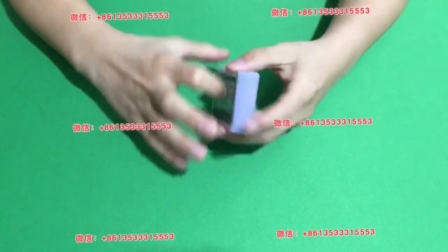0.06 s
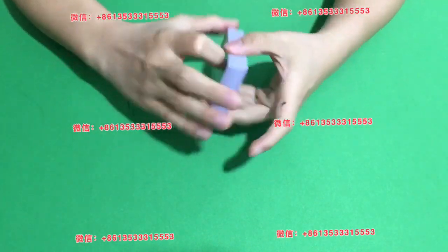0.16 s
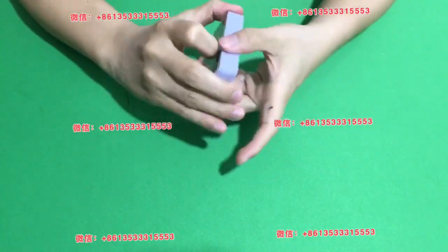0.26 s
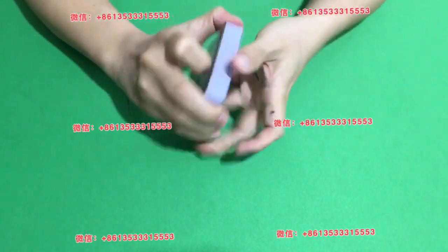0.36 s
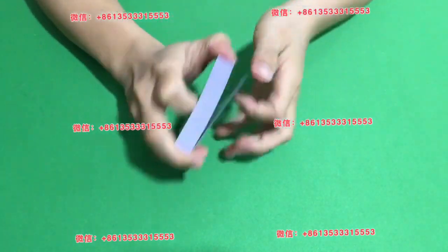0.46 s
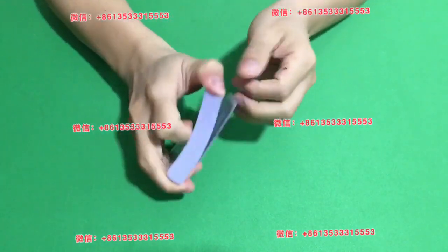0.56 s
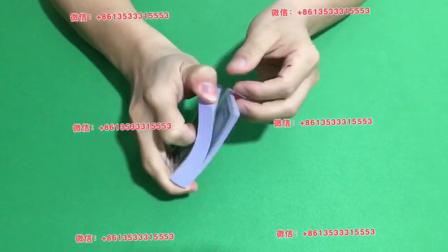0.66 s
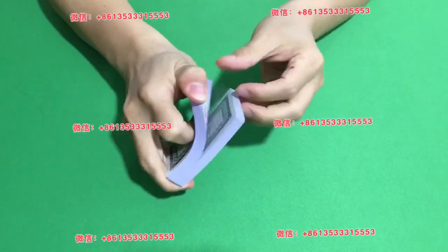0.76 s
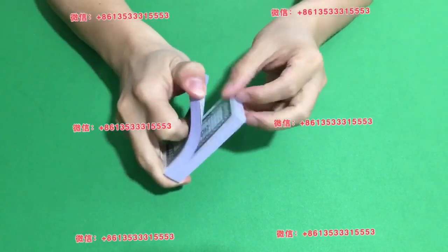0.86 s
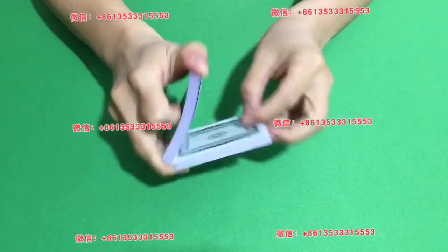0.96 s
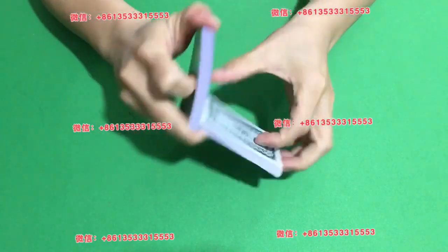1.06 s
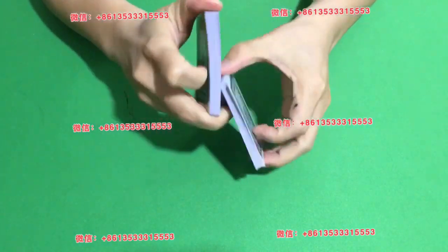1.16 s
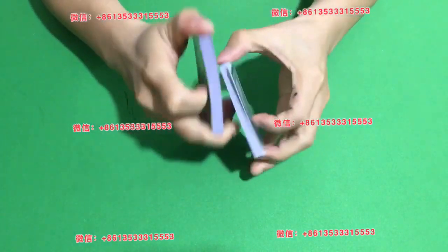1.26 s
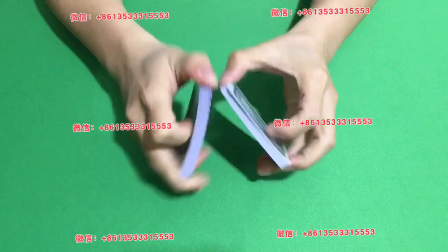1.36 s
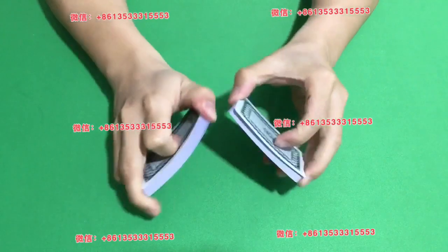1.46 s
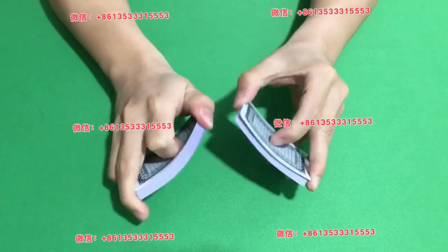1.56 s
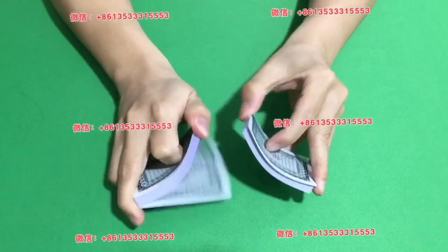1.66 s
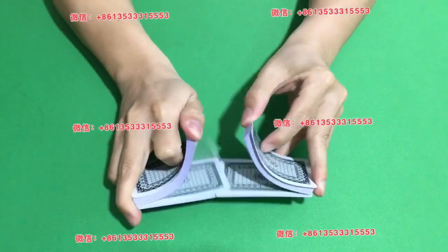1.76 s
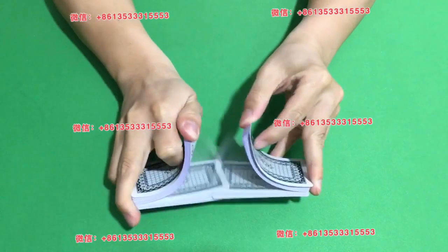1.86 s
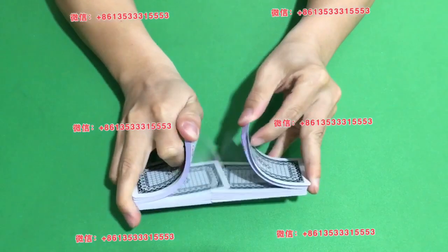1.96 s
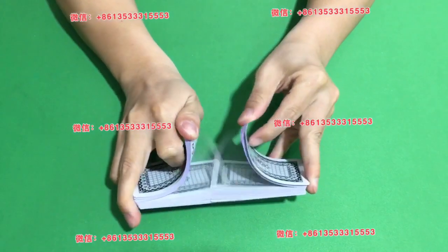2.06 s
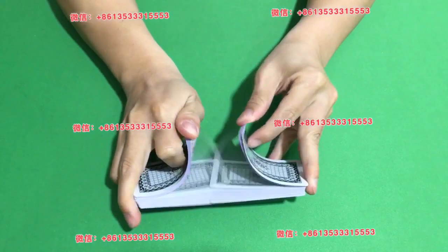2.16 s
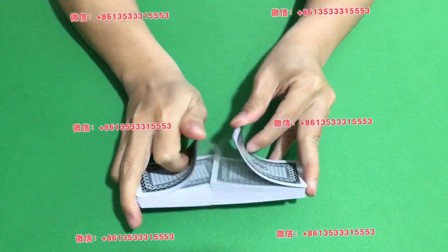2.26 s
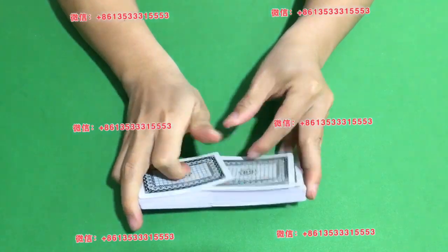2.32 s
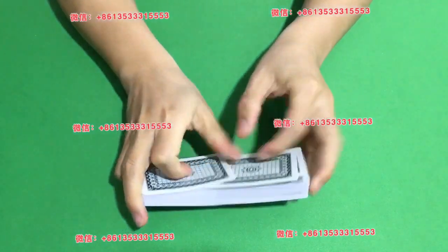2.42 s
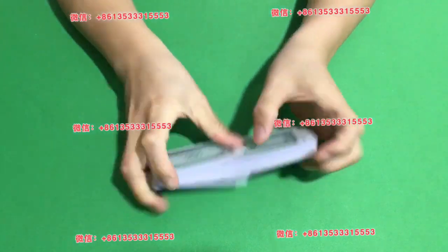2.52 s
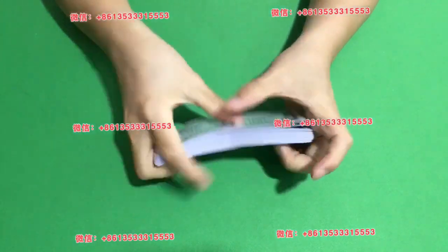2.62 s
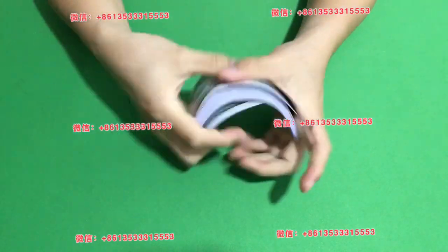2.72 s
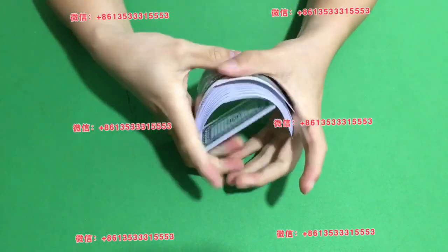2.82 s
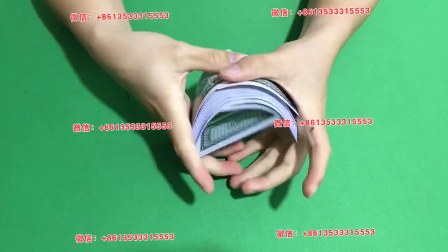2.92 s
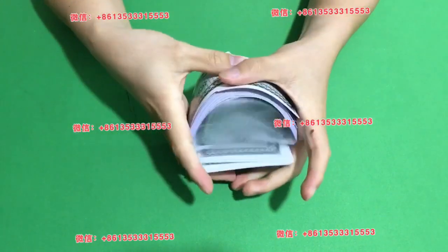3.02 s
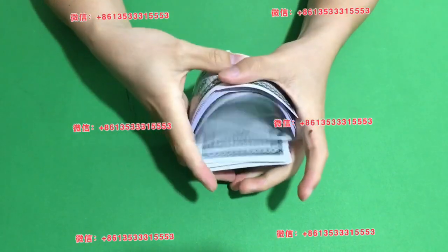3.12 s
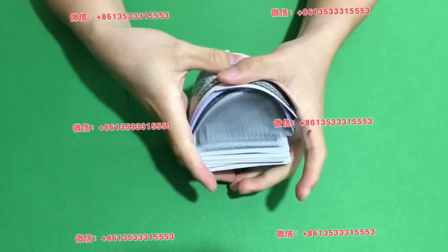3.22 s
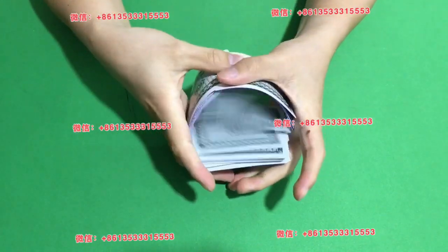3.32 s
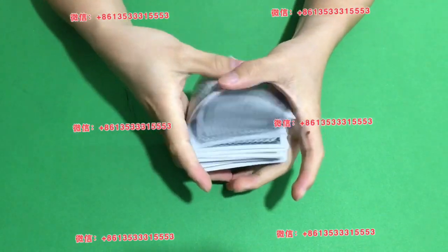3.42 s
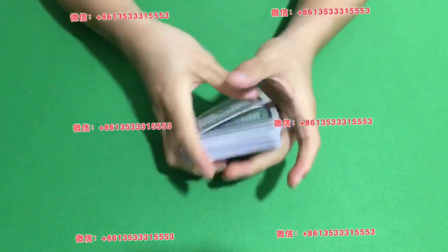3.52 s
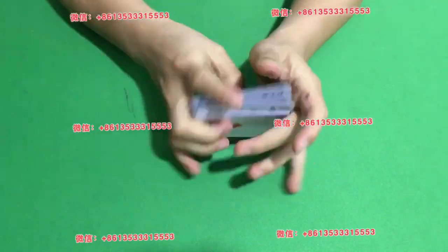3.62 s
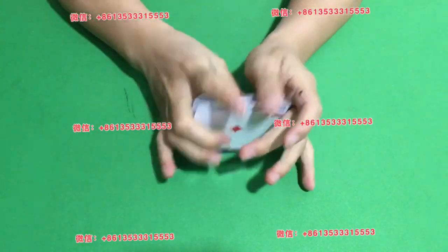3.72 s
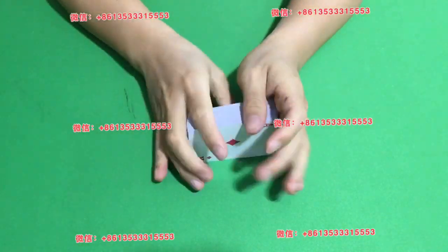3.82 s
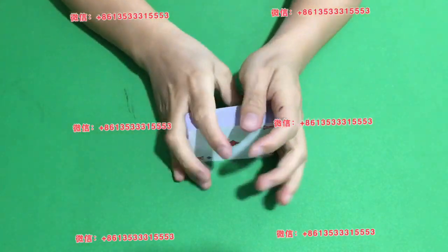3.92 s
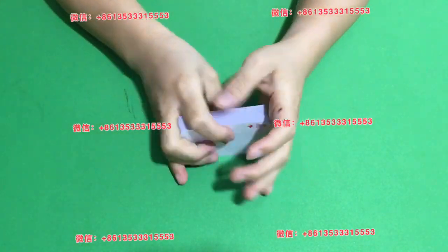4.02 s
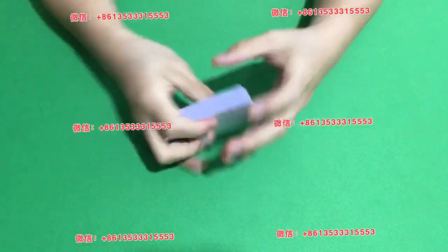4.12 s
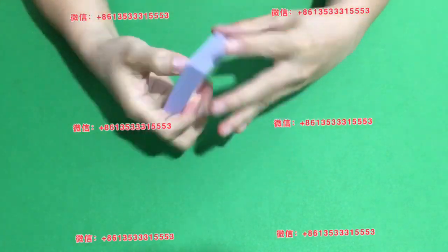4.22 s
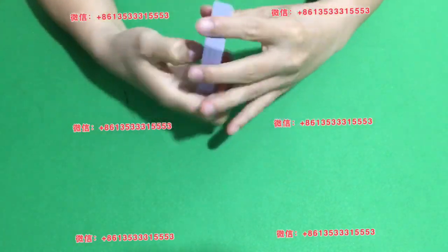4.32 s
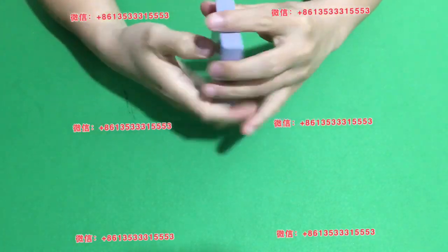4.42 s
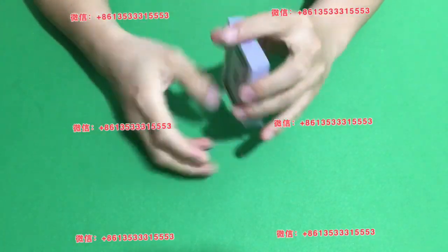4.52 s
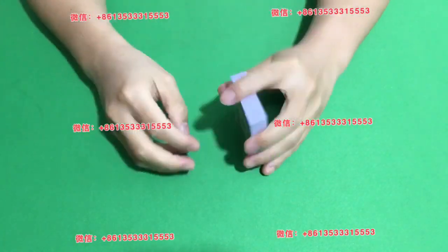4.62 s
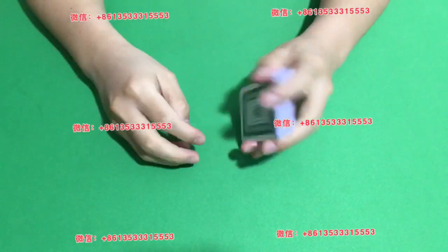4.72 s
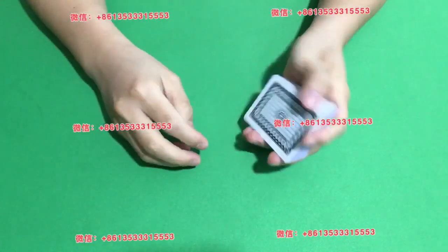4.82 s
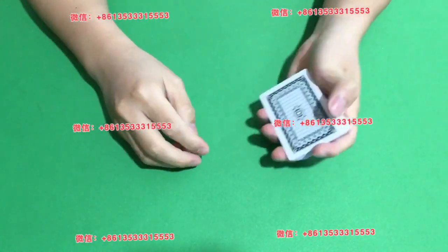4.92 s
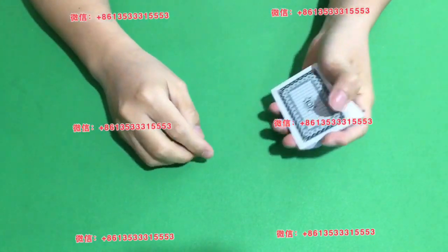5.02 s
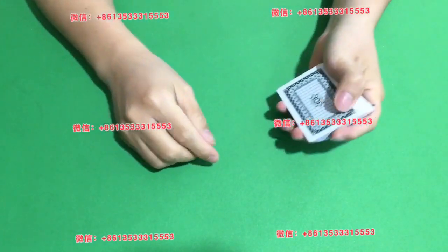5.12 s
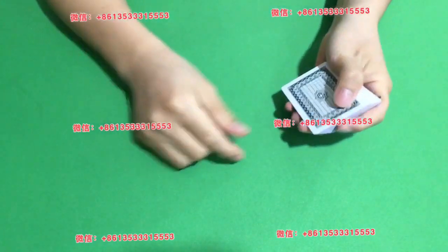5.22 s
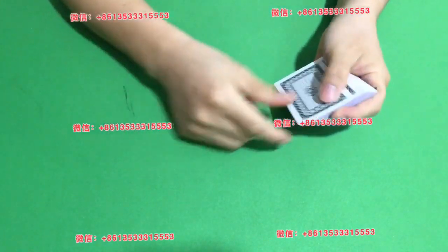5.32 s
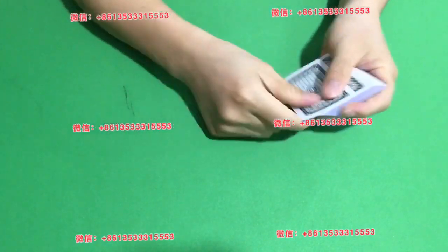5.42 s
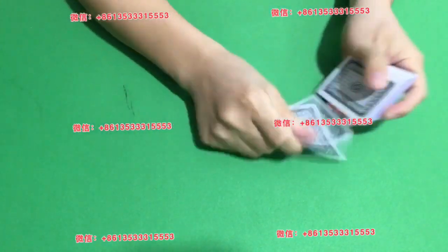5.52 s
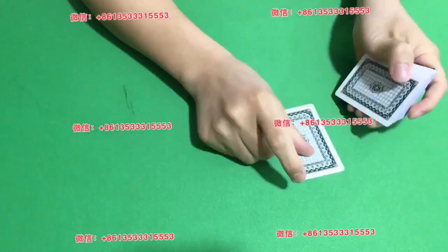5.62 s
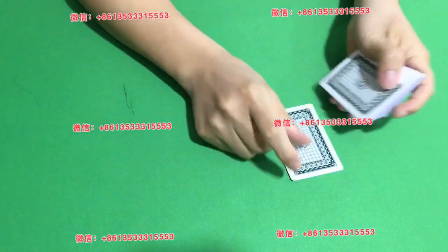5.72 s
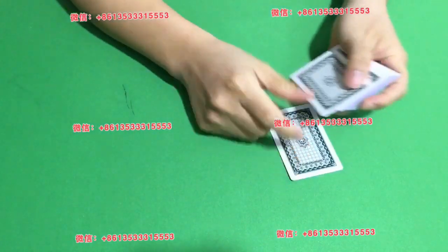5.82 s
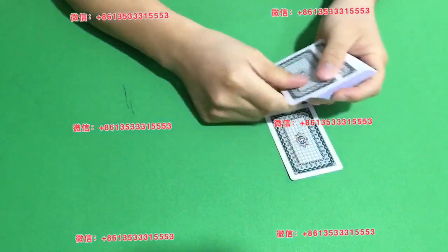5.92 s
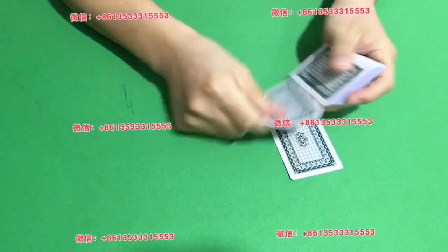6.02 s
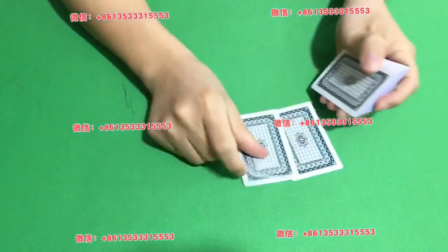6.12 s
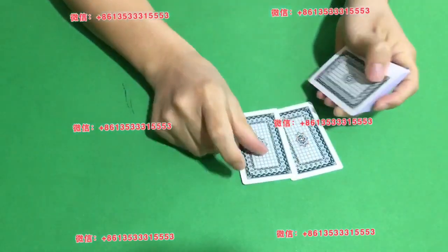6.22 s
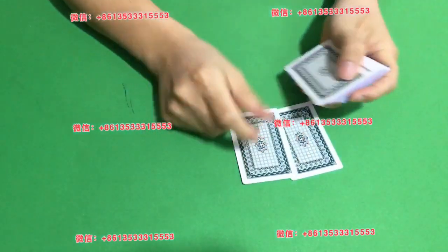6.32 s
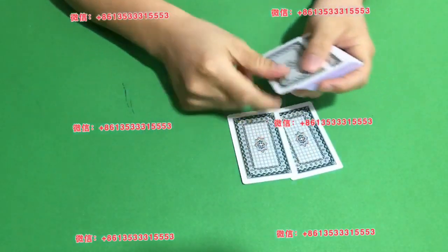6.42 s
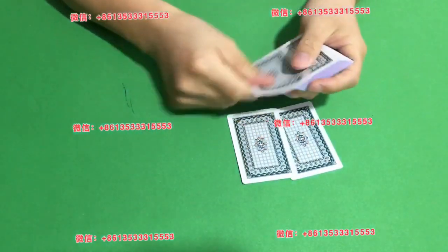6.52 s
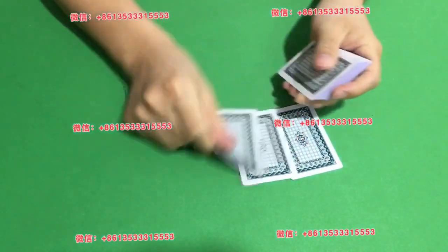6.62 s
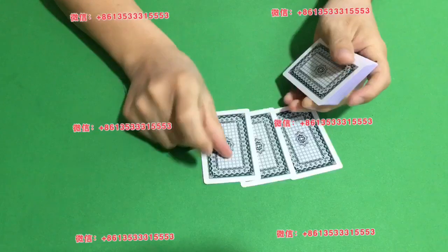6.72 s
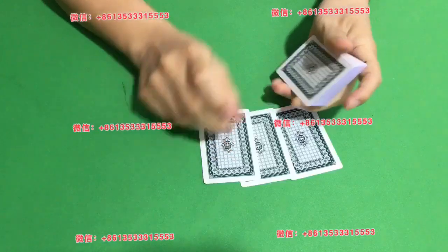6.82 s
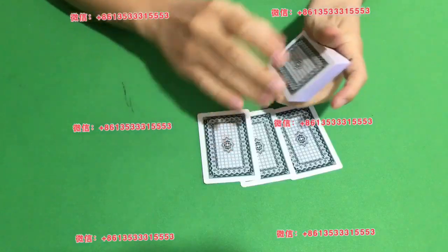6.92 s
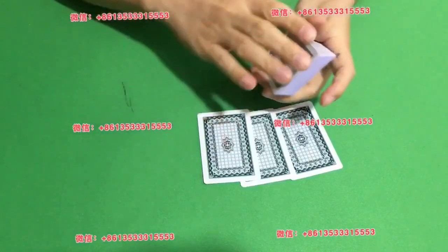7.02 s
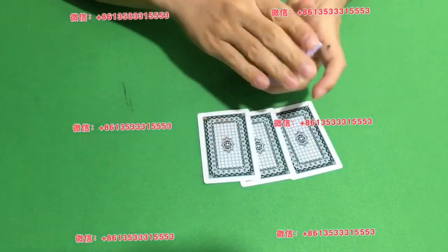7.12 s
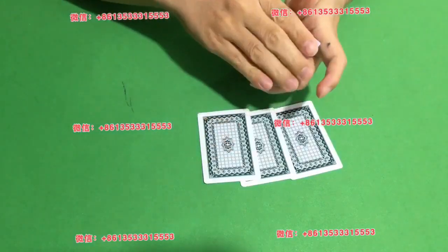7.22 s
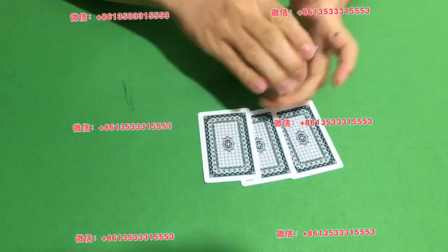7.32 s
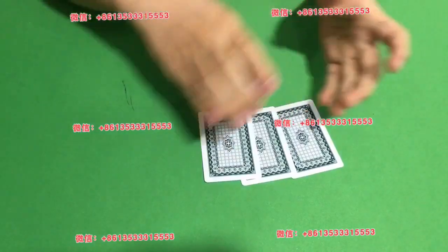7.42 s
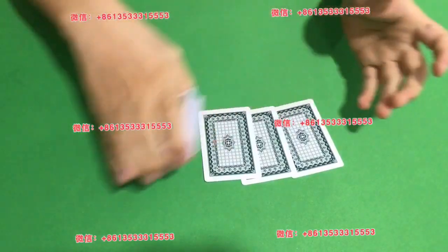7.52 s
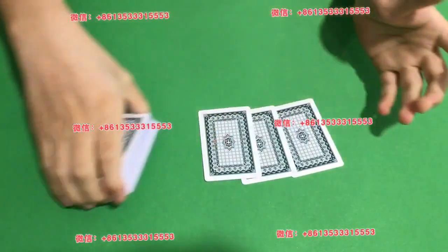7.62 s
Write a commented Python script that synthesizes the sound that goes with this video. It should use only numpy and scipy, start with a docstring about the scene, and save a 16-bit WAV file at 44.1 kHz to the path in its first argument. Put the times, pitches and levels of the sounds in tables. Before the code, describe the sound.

A small room with low rumbling air, faint hum and a soft fan scuff about seven times a second, rising during the first second. Close to the microphone, light card clicks from 0.4 s lead into a brief purr of corners, swelling to 0.7 s, and a tiny tap at 1.0. From 1.6 to 2.25 s a riffle crackles, dull at first, then brighter, with growing rubbing. A faint creak at 2.7 precedes the bridge, 2.9 to 3.4 s: a violent flutter, then an even run of slaps. At 3.7 the halves are shoved square with a muffled crunch and dull thump. A loud, deep knock at 4.55 booms through the padded table and room, with much weaker knocks either side. Three cards swish, snap and land softly near 5.45, 5.95 and 6.5 s, the last duller with a small knock. Quiet follows until a faint tap and thud at 7.4.

```python
"""In a small room with a low hum, something that turns, probably a fan, scuffs softly about seven times a second.
At a cloth-covered table a deck of cards is cut, riffled, bridged and pushed square; one loud knock stands out.
Then three cards are slid off the deck, flicked free and laid down.
Cards are made of short noise bursts, ringing tones and shaped hiss; knocks are sums of fading tones.
The fan is pulsed noise through resonances plus sine waves, and the air is filtered noise."""
import sys
import numpy as np
from scipy import signal
from scipy.fft import rfft, irfft
from scipy.io import wavfile

SR = 44100
rng = np.random.default_rng(int(sys.argv[2]) if len(sys.argv) > 2 else 0)


def wav_record(signal):
    """Record a signal, one row per channel, as 16-bit PCM in the file named by sys.argv[1]."""
    frames = np.transpose(np.atleast_2d(signal))
    bounded = np.clip(frames, -1, 1)
    # unit amplitude maps onto the largest positive 16-bit level
    quanta = np.round(bounded * 32767).astype(np.int16)
    wavfile.write(sys.argv[1], SR, quanta)


N = 338247
TIME = np.arange(N) / SR   # seconds

# room air, relative strength at each pitch: f/Hz, level/dB
AIR_COLOUR = [(25, -33.5), (36, -16), (47, 3.5), (58, -4), (85, -2), (105, -2.5), (140, 2), (220, -7.5),
              (400, -17), (800, -21.5), (1400, -27), (2000, -32.5), (3000, -39.5), (5000, -45.5),
              (15500, -53.5)]
# steady tones of the fan: f/Hz, rms level/dB
FAN_HUM = [(48.4, -59.5), (301.5, -67)]
# the fan's uneven rotation: t/s, turns made so far
FAN_TURNS = [(0, 0), (0.865, 6), (1.165, 8), (1.44, 10), (2.405, 17), (2.685, 19), (3.425, 24), (3.965, 28),
             (4.405, 31), (5.035, 35), (5.305, 37), (6.275, 44), (6.805, 48), (7.76, 55)]
# resonances of the fan housing: f/Hz, width of each of two passes/Hz, relative level/dB
FAN_HOUSING = [(420, 250, -2), (900, 330, 1), (1370, 280, 0), (1800, 900, -10), (3550, 450, -15)]
# time for the room's echoes to fade by 60 dB: f/Hz, fade time/s
ROOM_T60 = [(80, 0.96), (200, 1), (500, 0.97), (2000, 0.56), (5000, 0.57), (15000, 0.52)]
# the room's standing waves: f/Hz, level relative to the knock/dB, time to fade by 60 dB/s
ROOM_MODES = [(88, -29, 1.1), (100.3, -35.5, .7), (137, -29, 1), (168.4, -35, 1.1), (192, -33.5, 0.88),
              (205.3, -31.5, .9), (228.4, -38, 0.75), (270, -40, .7), (427, -53, .9), (533, -51.5, 0.78),
              (578, -50.5, .7)]
# the table top's own tones: f/Hz, level relative to the knock/dB, time to fade by 60 dB/s
TABLE_MODES = [(77, -15, 0.18), (132, -13, 0.089), (158.5, -10.5, 0.091), (207, -19.5, 0.14),
               (309, -22.5, 0.1), (453, -23, 0.054), (632, -27, 0.072), (788, -33.5, 0.045),
               (1117, -29.5, 0.023), (1480, -39.5, 0.028)]
# the deck knocks on the table, one of them far louder: t/s, level/dB
KNOCKS = [(3.72, -21.5), (4.426, -28), (4.555, 0), (4.677, -24), (6.498, -22), (7.431, -27.5)]
# packets slide over one another: middle t/s, length/s, level/dB
SLIDES = [(0.455, 0.028, -65.5), (2.473, 0.083, -66), (2.898, 0.14, -53), (3.35, 0.085, -54),
          (3.964, 0.1, -67), (6.545, 0.098, -64.5), (6.607, .016, -64)]
# packets land flat: t/s, level before TAP_GAIN_DB/dB
TAPS = [(1.029, -54), (3.641, -52), (3.658, -46), (3.671, -35), (3.69, -37), (3.699, -31.5), (3.716, -43),
        (3.7393, -34), (5.323, -55), (7.4, -48.5)]
# three dealt cards: flick t/s, slide level/dB, flick level/dB, level of all modes/dB, ring f/Hz, ring level/dB,
# lingering ring relative to the ring/dB, upper edge of flick and modes f/Hz, lay-down t/s, lay-down level/dB
DEALS = [(5.4343, -60, -10.5, -28, 3290, -28.5, -55, 9000, 5.4926, -33),
         (5.9446, -58.5, -12.5, -35.5, 2350, -25, -31, 7000, 6.0354, -36.5),
         (6.496, -55.5, -11, -31.5, 830, -28, -40, 2970, 6.5896, -37)]
# bending tones of a flicked card: f/Hz, relative level/dB, decay/s
CARD_MODES = [(310, -2, 0.0046), (850, -7.5, .003), (1232, -3, .004), (1795, -8.5, .0028), (2330, -5, .003)]
# single card-edge clicks, a few around the cut, the rest in the riffle:
# t/s, level before trims/dB, ring f/Hz, treble relative to body before trims/dB
CARD_SNAPS = [(0.396, -42.5, 2820, -14), (0.481, -40.5, 2510, -16), (0.563, -38.5, 1150, -21),
              (0.688, -43, 3100, -24), (0.705, -43, 3600, -24), (0.727, -49, 3400, -24),
              (1.574, -38, 1020, -43), (1.586, -39.5, 1310, -36), (1.602, -34.5, 1340, -35),
              (1.615, -35.5, 1350, -35), (1.635, -36, 1000, -35), (1.654, -33.5, 1170, -32),
              (1.658, -31.5, 1380, -18), (1.666, -29.5, 1710, -24), (1.685, -34, 1620, -19),
              (1.695, -34, 1040, -35), (1.704, -39, 1120, -24), (1.718, -27.5, 1770, -19),
              (1.725, -32, 1310, -13), (1.753, -27, 2270, -17.5), (1.767, -39, 1210, -23),
              (1.778, -33, 2150, -15), (1.793, -44, 1060, -30), (1.8, -33, 1490, -29),
              (1.809, -28, 2230, -17.5), (1.826, -33, 1440, -28), (1.835, -29.5, 1510, -14),
              (1.844, -29.5, 2020, -15), (1.866, -35, 1490, -11), (1.87, -34, 2020, -15),
              (1.886, -31, 1070, -28), (1.896, -26.5, 1870, -17.5), (1.913, -35, 2060, -15),
              (1.921, -34, 1470, -8.5), (1.939, -37, 1040, -21), (1.951, -28.5, 2270, -15.5),
              (1.974, -39, 1290, -22), (1.996, -29, 1510, -12.5), (2.004, -36, 1500, -12),
              (2.022, -34, 1460, -12), (2.037, -29, 3030, -11), (2.044, -37.5, 3110, -6.5),
              (2.084, -27, 2250, -20), (2.101, -33.5, 1000, -9.5), (2.108, -36, 1800, -9),
              (2.127, -34, 1830, -11), (2.133, -33, 1290, -13), (2.145, -30.5, 2430, -11.5),
              (2.153, -32, 1230, -16), (2.184, -33, 1210, -24), (2.192, -35, 1700, -9),
              (2.204, -35, 2400, -8.5), (2.21, -34, 3670, -16), (2.232, -35.5, 2180, -7),
              (2.241, -25, 1900, -14), (2.252, -26.5, 1420, -24)]
# single bridge cards slapping on the pile, and one card-edge tick after the bridge: t/s, level before trims/dB,
# ring f/Hz, # treble relative to body before trims/dB, thud of the pile before trims/dB
BRIDGE_SLAPS = [(2.915, -31, 1530, -20, -48), (2.932, -25, 3040, -12.5, -22),
                (2.9497, -22, 2860, -14.5, -41), (2.9548, -22, 1150, -19, -23),
                (2.968, -28, 2660, -19, -28), (2.978, -22.5, 1430, -26, -23), (2.986, -28, 1110, -16, -32),
                (2.9935, -22, 3100, -17, -29), (3.039, -33, 1620, -23, -29), (3.057, -35, 2770, -21, -38),
                (3.069, -27.5, 2970, -18, -23.5), (3.074, -35, 3000, -16, -38),
                (3.0915, -27, 1840, -20, -21.5), (3.11, -27.5, 3330, -18, -38),
                (3.1195, -24.5, 3370, -18, -43), (3.161, -34, 1370, -20, -29), (3.19, -35, 3120, -18, -31),
                (3.212, -33, 3200, -21, -40), (3.219, -34, 2940, -18, -27), (3.233, -36, 3390, -22, -38),
                (3.249, -28.5, 2880, -27, -34), (3.283, -30, 2920, -27, -36),
                (3.312, -25.5, 1580, -21, -28), (3.369, -31.5, 2180, -29, -25),
                (3.561, -36.5, 1383, -22, -42)]

# colours, the relative strength at each pitch, all with columns f/Hz, level/dB
SNAP_COLOUR = [(100, -13), (300, 5), (600, 5), (1500, -2.5), (3400, -2.5), (5000, -4.5), (6500, -3.5),
               (9000, -7), (10400, -11.5), (12000, -10), (16000, -17)]   # card-edge click
SLAP_COLOUR = [(100, -13), (300, 12), (520, 0.5), (800, 4.5), (1500, 0.5), (3400, 2.5), (5000, -1.5),
               (6500, 4), (9000, -3.5), (10400, -3.5), (12000, -3.5), (16000, -13)]   # bridge card on the pile
TAP_COLOUR = [(70, 11.5), (240, 13.5), (480, 1), (750, -5.5), (1050, 6.5), (1600, 4), (2200, -3),
              (2700, -19), (4300, -19.5), (5500, -20), (8000, -46), (16000, -39)]   # flat landing
FLICK_COLOUR = [(70, 3.5), (330, 13), (530, -7.5), (850, 3), (1230, 5.5), (1550, 0), (1800, 5), (2330, -3),
                (2700, -9), (3400, -2.5), (4200, -17), (5500, -16), (9000, -33), (16000, -42)]   # whipping card
PATTER_COLOUR = [(80, -16), (180, 0), (310, 9), (520, -9), (800, -1.5), (1500, -6), (2300, -11.5),
                 (3400, -25), (5000, -21.5)]   # dull landings on the pile
RUB_COLOUR = [(500, -8), (1500, -1), (2500, 4.5), (3300, 10.5), (5000, -4), (6500, -4.5), (9000, 3),
              (10400, -4.5), (12000, -2), (16000, -15)]   # faces rubbing
SLIDE_COLOUR = [(500, -5), (1500, 11.5), (3300, 7), (4800, 2), (6300, 3), (9000, -1.5), (10400, -11),
                (12000, -8), (16000, -18)]   # sliding packets and edges
DRAW_COLOUR = [(500, -5), (1500, 11), (3300, 6), (4800, 0), (8500, 0), (10400, -4), (12000, -4),
               (16000, -12)]   # card drawn off the deck
CUT_COLOUR = [(100, -24), (300, 12), (500, -3), (800, 1), (1200, -7), (2200, -11), (3400, -14.5),
              (4600, -28), (6200, -28), (9000, -43), (16000, -48)]   # corners past the thumb
SQUARE_COLOUR = [(60, -19), (140, 15.5), (220, -6.5), (300, 12), (420, -4.5), (800, 1), (1200, -2.5),
                 (1900, -0.5), (2500, -13), (3400, -15.5), (5000, -39), (8000, -45), (16000, -60)]   # halves pushed together

# room noise and the fan's scuff both come up at the start, until SETTLED_S
AIR_DB, AIR_RISE_DB, SETTLED_S = -49.5, 2.5, 0.95
SCUFF_DB, SCUFF_RISE_DB, SCUFF_FADE_DB_PER_S = -63.5, 26, 0.59
ROOM_SWELL_S = 0.022   # the standing waves build up this slowly
# the parts of every deal: seconds ahead of the flick or lay-down (for slides, to their middle), length
DRAW_LEAD_S, DRAW_S = 0.028, 0.067   # the card's face slides off the deck
EDGE_LEAD_S, EDGE_S, EDGE_DB = 0.0056, 0.0068, -48   # its edge scrapes past the deck's corner
BRUSH_LEAD_S, BRUSH_S, BRUSH_DB = 0.0029, 0.0075, -45.5   # it slips off the finger
CATCH_LEAD_S, CATCH_DB = .014, -11   # it catches on the deck; level relative to the flick
TAP_GAIN_DB, LAY_TICK_DB = 20, 9   # added to a landing's pulse, and to the tick on the open table
# the thumb runs down the deck to cut it, pressing ever harder
CUT_START_S, CUT_END_S, CUT_DB, CUT_SWELL_DB = .53, .708, -44.5, 13
# the riffle: the first cards drop dully, then both thumbs let go and the rubbing grows as the packets thin
RIFFLE_START_S, RIFFLE_FREE_S, RIFFLE_END_S = 1.58, 1.655, 2.255
RIFFLE_PATTER_DB, RIFFLE_RUB_DB, RIFFLE_RUB_SWELL_DB = -46.5, -55, 13
# the woven halves creak against each other as they are bent into an arch
ARCH_START_S, ARCH_END_S, ARCH_DB = 2.65, 2.72, -60.5
# the bridge gives way in a rush, then runs down evenly; the rush levels are added to the run's
BRIDGE_START_S, BRIDGE_END_S, BRIDGE_PATTER_DB, BRIDGE_RUB_DB = 2.912, 3.378, -49.5, -55
RUSH_S, RUSH_WIDTH_S, RUSH_PATTER_DB, RUSH_RUB_DB = 2.95, 0.022, 8, 8
# the interleaved halves are pushed square in one shove
SQUARE_S, SQUARE_DB, SQUARE_RISE_DB_PER_S, SQUARE_FALL_DB_PER_S = 3.698, -28, 425, 643
# the patter makes the table top sway; level relative to the patter
SWAY_HZ, SWAY_WIDTH_HZ, SWAY_DB = 49, 16, -7.5
CLICK_DELAY_S = .0008   # clicks and flicks start this long after their listed times
# louder clicks are brighter, quieter ones duller: dB of treble per dB from medium, counted up to 3 dB above it
LOUD_BRIGHT, MEDIUM_CLICK_DB = 0.36, -28.5
CUTOFF_HZ = 16200


def from_db(db):
    """Turn decibels into a gain."""
    return 10 ** (np.asarray(db) / 20)


def rms_one(x):
    """Scale a sound to an average (rms) strength of 1."""
    return x / np.sqrt(np.mean(x ** 2) + 1e-20)


def at_hz(points, hz):
    """Read a table on a log-frequency axis."""
    freqs, values = np.transpose(points)
    return np.interp(np.log(np.maximum(hz, 1)), np.log(freqs), values)


def add(track, s, sound):
    """Lay a sound into a track at time s."""
    start = int(np.clip(s * SR, 0, N - 1))
    track[start:start + len(sound)] += sound[:N - start]


def butter(x, hz, kind, order=2):
    """Keep the lows, the highs or a band of a sound."""
    sections = signal.butter(order, np.clip(hz, 10, .45 * SR), kind, fs=SR, output="sos")
    return signal.sosfilt(sections, x)


def resonance(x, hz, width_hz):
    """Two-pole resonance with gain 1 on top."""
    r = np.exp(-np.pi * width_hz / SR)
    top = np.array([1, 0, -1]) * (1 - r * r) / 2
    return signal.lfilter(top, [1, -2 * r * np.cos(2 * np.pi * hz / SR), r * r], x)


def coloured(x, spectrum, size=8192):
    """Causal (minimum-phase) filter of the given colour; white noise keeps its power."""
    gains = from_db(at_hz(spectrum, np.arange(size // 2 + 1) * SR / size))
    cepstrum = irfft(np.log(gains))
    # folding the cepstrum puts the filter's energy as early as possible
    cepstrum[1:size // 2] *= 2
    cepstrum[size // 2 + 1:] = 0
    response = irfft(np.exp(rfft(cepstrum)))
    return signal.oaconvolve(x, response / np.linalg.norm(response))[:N]


def flutter(per_s):
    """Random wobble of rms 1, with this many new values a second."""
    knots = np.arange(N) * per_s / SR
    count = int(knots[-1]) + 2
    return rms_one(np.interp(knots, np.arange(count), rng.standard_normal(N)[:count]))


def stroke(start_s, end_s, attack_s, release_s, swell_db):
    """Gain of one movement: an attack, a hold that changes steadily by swell_db towards 1, a release."""
    along = np.clip((TIME - start_s) / (end_s - start_s), 0, 1)
    attack = 1 - np.exp(-np.maximum(TIME - start_s, 0) / attack_s)
    release = np.exp(-np.clip((TIME - end_s) / release_s, 0, 20))
    return attack * release * from_db(swell_db * (along - 1))


def burst(decay_s, crack, size=2048):
    """One contact: a sharp first impact and a dying chatter of micro-impacts; energy 1."""
    chatter = rng.standard_normal(size) * np.exp(-np.arange(size) / (decay_s * SR))
    chatter /= np.linalg.norm(chatter)
    chatter[0] = crack
    return chatter / np.linalg.norm(chatter)


def scrape(rise_s, decay_s, size=2048):
    """A contact that builds up as the card bends, then dies away; energy 1."""
    t = TIME[:size]
    chatter = rng.standard_normal(size) * (1 - np.exp(-t / rise_s)) * np.exp(-t / decay_s)
    return chatter / np.linalg.norm(chatter)


def quiver(hz, rise_s, decay_s, size=13230):
    """One damped mode, set going by a soft push."""
    t = TIME[:size]
    return np.sin(2 * np.pi * hz * t) * (1 - np.exp(-t / rise_s)) * np.exp(-t / decay_s)


def air():
    """Rumble and hiss of the room: filtered noise that rises a little, then holds steady."""
    level_db = AIR_DB - AIR_RISE_DB * np.maximum(1 - TIME / SETTLED_S, 0)
    return from_db(level_db) * coloured(rng.standard_normal(N), AIR_COLOUR)


def fan():
    """A low hum, and once a turn a scuff that rings in the housing; the speed wanders a little."""
    turns = np.interp(TIME, *np.transpose(FAN_TURNS))
    turns_per_s = np.gradient(turns) * SR
    since_s = (turns % 1) / np.maximum(turns_per_s, 1)   # time since the last scuff began
    scuff = (1 - np.exp(-(since_s / .012) ** 2)) * np.exp(-since_s / .036)
    rubbing = rng.standard_normal(N) * scuff * from_db(flutter(5.5))
    housing = np.zeros(N)
    for hz, width, db in FAN_HOUSING:
        housing += from_db(db) * resonance(resonance(rubbing, hz, width), hz, width)
    housing = rms_one(butter(housing, 3800, "low", order=4))
    hum = np.zeros(N)
    for hz, db in FAN_HUM:
        hum += from_db(db) * np.sqrt(2) * np.sin(2 * np.pi * hz * TIME + 0.48 * flutter(2.4))
    start_db = SCUFF_RISE_DB * np.maximum(1 - TIME / SETTLED_S, 0)
    return from_db(SCUFF_DB - SCUFF_FADE_DB_PER_S * TIME - start_db) * housing + hum


def room(x, wet_db, echo_db, dull_hz):
    """Direct sound, one wall echo and a diffuse tail whose fading time depends on pitch."""
    t, edges = TIME[:SR], np.geomspace(40, 18000, 10)
    tail = np.zeros(SR)
    for low, high in zip(edges, edges[1:]):
        fade = np.exp(-np.log(1000) * t / at_hz(ROOM_T60, np.sqrt(low * high)))
        tail += butter(rng.standard_normal(SR), [low, high], "band") * fade
    tail *= 1 - np.exp(-(t / 0.0077) ** 2)
    response = from_db(wet_db) * tail / np.linalg.norm(tail)
    add(response, .017, from_db([echo_db]))
    return x + signal.fftconvolve(x, butter(response, dull_hz, "low", order=1))[:N]


def mode_sum(modes, t):
    """Add up sine tones that each fade by 60 dB in their own time."""
    return sum(from_db(db - 60 * t / t60) * np.sin(2 * np.pi * hz * t) for hz, db, t60 in modes)


def knocks():
    """The deck's edge clicks dully and sets the table booming; the room's standing waves swell and hum on."""
    t, out = TIME[:SR], np.zeros(N)
    # the cloth softens the blow; the lowest pitches of the boom are cut away steeply
    boom = butter(mode_sum(TABLE_MODES, t) * (1 - np.exp(-t / 0.0025)), 66, "high", order=4)
    boom += mode_sum(ROOM_MODES, t) * (1 - np.exp(-t / ROOM_SWELL_S))
    click = butter(burst(decay_s=0.0022, crack=0.3), 1860, "low")
    click = butter(click, 830, "low", order=1)
    for s, db in KNOCKS:
        add(out, s, from_db(db) * boom)
        add(out, s - .001, from_db(db + 2.5) * click)
    return out


def sway(patter):
    """A low mode of the table top, kept going by the landing cards: noise through a double resonance."""
    shaking = resonance(rng.standard_normal(N), SWAY_HZ, SWAY_WIDTH_HZ)
    shaking = resonance(shaking, SWAY_HZ, SWAY_WIDTH_HZ)
    return from_db(SWAY_DB) * patter * rms_one(shaking)


def pile_thuds(rows, hz, level_db, decay_s):
    """Every landing makes the pile thud, at a slightly different pitch each time."""
    out = np.zeros(N)
    for (s, db, *_), detune in zip(rows, rng.normal(0, 0.12, len(rows))):
        add(out, s, from_db(db + level_db) * quiver(hz * np.exp(detune), rise_s=0.002, decay_s=decay_s))
    return out


def hiss(strokes, colour):
    """Card faces rub: rough noise that swells and fades with each stroke."""
    speed = np.zeros(N)
    for s, length, db in strokes:
        add(speed, s - length / 2, from_db(db) * np.hanning(int(length * SR) + 2))
    return coloured(speed * rng.standard_normal(N) * from_db(0.77 * flutter(500)), colour)


def slides():
    """Packets slide with a hiss; every deal has three strokes: drawing, edge and finger."""
    strokes, draws = list(SLIDES), []
    for flick_s, slide_db, *_, lay_s, _ in DEALS:
        draws.append((flick_s - DRAW_LEAD_S, DRAW_S, slide_db))
        strokes.append((flick_s - EDGE_LEAD_S, EDGE_S, EDGE_DB))
        strokes.append((lay_s - BRUSH_LEAD_S, BRUSH_S, BRUSH_DB))
    return hiss(strokes, SLIDE_COLOUR) + hiss(draws, DRAW_COLOUR)


def taps():
    """A flat landing is nearly a single pulse: muffled between the palms, with a bright tick on the open table."""
    held, laid, ticks = np.zeros((3, N))
    for s, db in TAPS:
        add(held, s, -from_db(db + TAP_GAIN_DB) * burst(decay_s=.0012, crack=3.5))
    for *_, s, db in DEALS:
        add(laid, s, -from_db(db + TAP_GAIN_DB) * burst(decay_s=.0012, crack=3.5))
        add(ticks, s, from_db(db + LAY_TICK_DB) * burst(decay_s=0.00068, crack=0.71))
    thuds = pile_thuds([deal[-2:] for deal in DEALS], hz=300, level_db=4.5, decay_s=0.0031)
    pulses = butter(held, 3800, "low", order=4) + laid
    return coloured(pulses, TAP_COLOUR) + coloured(ticks, SLIDE_COLOUR) + thuds


def flicks():
    """The card catches, then whips against the deck: a soft scrape, then a sharper one."""
    whips = np.zeros(N)
    for s, _, db, *_, dull_hz, _, _ in DEALS:
        whip = .8 * scrape(rise_s=.0009, decay_s=.0033) + .55 * burst(decay_s=.001, crack=1.5)
        add(whips, s - CATCH_LEAD_S, from_db(db + CATCH_DB) * scrape(rise_s=0.0051, decay_s=0.011))
        add(whips, s + CLICK_DELAY_S, from_db(db) * butter(whip, dull_hz, "low"))
    return coloured(whips, FLICK_COLOUR)


def card_rings():
    """The freed card quivers in all its modes; the grip favours one tone, which lingers faintly and unevenly."""
    out = np.zeros(N)
    for s, _, _, modes_db, hz, ring_db, linger_db, dull_hz, *_ in DEALS:
        modes = sum(from_db(db) * quiver(mode_hz, rise_s=0.001, decay_s=decay_s)
                    for mode_hz, db, decay_s in CARD_MODES)
        linger = quiver(hz, rise_s=.005, decay_s=.06) * flutter(70)[:13230]
        ring = quiver(hz, rise_s=.0008, decay_s=.0026) + from_db(linger_db) * linger
        add(out, s, from_db(modes_db) * butter(modes, dull_hz, "low") + from_db(ring_db) * ring)
    return out


def card_train(per_s, uneven, spread_db, decay_s, crack, pace=1):
    """Cards let go one after another at an uneven pace, each with its own force."""
    rate = per_s * pace * np.exp(uneven * flutter(per_s))
    count = np.floor(np.cumsum(rate) / SR)
    strength = from_db(spread_db * np.clip(rng.standard_normal(N), -1.5, 1.5))
    force = np.diff(count, prepend=0) * strength + 1e-18   # a pulse whenever the count steps up
    chatter = signal.lfilter([1], [1, -np.exp(-1 / (decay_s * SR))], force) * rng.standard_normal(N)
    return rms_one(crack * rms_one(butter(force, 243, "high")) + rms_one(chatter))


def squaring():
    """The halves stick and slip into one another, muffled by the palms: a dull, brief train of contacts."""
    slips = card_train(per_s=250, uneven=.3, spread_db=1.2, decay_s=.0018, crack=.45)
    rise_db = SQUARE_RISE_DB_PER_S * (SQUARE_S - TIME)
    fall_db = SQUARE_FALL_DB_PER_S * (TIME - SQUARE_S)
    return coloured(from_db(SQUARE_DB - np.maximum(rise_db, fall_db)) * slips, SQUARE_COLOUR)


def cut():
    """Card corners purr past the thumb, slower and harder as it nears the middle of the deck."""
    pace = np.interp(TIME, [CUT_START_S, CUT_END_S], [1.15, .75])
    purr = card_train(per_s=175, uneven=.2, spread_db=1, decay_s=.0018, crack=.6, pace=pace)
    pressure = stroke(CUT_START_S, CUT_END_S, attack_s=0.013, release_s=0.024, swell_db=CUT_SWELL_DB)
    return from_db(CUT_DB) * coloured(pressure * purr, CUT_COLOUR)


def card_clicks(rows, colour, level_db, decay_s, edge_s, ring, ring_width_hz, bright_db, split_hz):
    """Each card's edge gives a brief bright tick; its face slaps and rings in a bending mode."""
    out = np.zeros(N)
    for s, db, hz, treble_db, *_ in rows:
        contact = burst(decay_s, crack=.45)
        body = butter(contact + ring * resonance(contact, hz, ring_width_hz), split_hz, "low", order=3)
        edge = butter(scrape(rise_s=.0004, decay_s=edge_s), split_hz, "high", order=3)
        loud_bright_db = LOUD_BRIGHT * min(db - MEDIUM_CLICK_DB, 3)
        add(out, s + CLICK_DELAY_S, from_db(db + level_db) * body / np.linalg.norm(body))
        add(out, s + CLICK_DELAY_S, from_db(db + level_db + treble_db + bright_db + loud_bright_db) * edge)
    return coloured(out, colour)


def falling_cards(patter, rub, per_s, grit_db):
    """Under the clicks, cards patter dully on the pile while their faces rub."""
    train = card_train(per_s, uneven=.5, spread_db=4.0, decay_s=0.0015, crack=0.94)
    landings = butter(coloured(patter * train, PATTER_COLOUR), 4200, "low", order=4)
    friction = rms_one(rng.standard_normal(N) * from_db(grit_db * flutter(450)))
    return landings + coloured(rub * friction, RUB_COLOUR)


def lesser_cards(start_s, end_s, count, db, spread_db, ring_hz, first_treble_db, last_treble_db):
    """More cards of a run, unevenly spaced, brightness drifting: rows of t/s, level/dB, ring f/Hz, treble/dB."""
    along = (np.arange(count) + rng.random(count)) / count
    force, pitch, edge = np.clip(rng.standard_normal((count, 3)), -1.5, 1.5).T
    times = start_s + along * (end_s - start_s)
    treble_db = first_treble_db + (last_treble_db - first_treble_db) * along + 3 * edge
    return np.transpose([times, db + spread_db * force, ring_hz * np.exp(.15 * pitch), treble_db])


def snaps_and_riffle():
    """Card edges click around the cut; then cards spring off both thumbs over patter, rubbing and thuds."""
    lesser = lesser_cards(RIFFLE_FREE_S, RIFFLE_END_S, count=10, db=-39, spread_db=2.0, ring_hz=1400,
                          first_treble_db=-29, last_treble_db=-17)
    cards = [*CARD_SNAPS, *lesser]
    patter = stroke(RIFFLE_START_S, RIFFLE_END_S, attack_s=0.037, release_s=0.018, swell_db=2.5)
    patter *= from_db(RIFFLE_PATTER_DB)
    rub = stroke(RIFFLE_FREE_S, RIFFLE_END_S, attack_s=.004, release_s=0.011, swell_db=RIFFLE_RUB_SWELL_DB)
    rub *= from_db(RIFFLE_RUB_DB)
    clicks = card_clicks(cards, SNAP_COLOUR, level_db=7.0, decay_s=0.0021, edge_s=0.0016, ring=2.55,
                         ring_width_hz=260, bright_db=16.0, split_hz=3340)
    thuds = pile_thuds(cards, hz=298, level_db=-16.5, decay_s=0.006)
    return clicks + falling_cards(patter, rub, per_s=120, grit_db=5.0) + thuds + sway(patter)


def arch():
    """The woven halves creak as they bend: a short swell of softened noise."""
    bend = stroke(ARCH_START_S, ARCH_END_S, attack_s=0.018, release_s=0.0088, swell_db=-3)
    creak = from_db(ARCH_DB) * bend * rng.standard_normal(N)
    return butter(coloured(creak, RUB_COLOUR), 4500, "low", order=1)


def bridge():
    """The arched deck springs flat card by card, most violently at first."""
    lesser = lesser_cards(BRIDGE_START_S, BRIDGE_END_S, count=30, db=-37, spread_db=1.8, ring_hz=2600,
                          first_treble_db=-21, last_treble_db=-19)
    cards = [*BRIDGE_SLAPS, *lesser]
    run = stroke(BRIDGE_START_S, BRIDGE_END_S, attack_s=0.0047, release_s=0.015, swell_db=0.5)
    rush = np.exp(-((TIME - RUSH_S) / RUSH_WIDTH_S) ** 2)
    patter = run * from_db(BRIDGE_PATTER_DB + RUSH_PATTER_DB * rush)
    rub = run * from_db(BRIDGE_RUB_DB + RUSH_RUB_DB * rush)
    clicks = card_clicks(cards, SLAP_COLOUR, level_db=7.0, decay_s=0.0018, edge_s=0.0017, ring=2.7,
                         ring_width_hz=380, bright_db=12.0, split_hz=4300)
    thud_rows = [(s, thud_db) for s, *_, thud_db in BRIDGE_SLAPS]
    thuds = pile_thuds(thud_rows, hz=332, level_db=-2.5, decay_s=0.0032)
    return arch() + clicks + falling_cards(patter, rub, per_s=130, grit_db=4.0) + thuds


def scene():
    """Cards and table sound in the small room, over its fan and air."""
    cards = cut() + snaps_and_riffle() + bridge() + slides() + taps()
    heard = room(cards, wet_db=-10, echo_db=-16.5, dull_hz=5000)
    heard += room(knocks(), wet_db=-11.5, echo_db=-25, dull_hz=3000)
    heard += room(squaring() + flicks(), wet_db=-14, echo_db=-14, dull_hz=3000)
    heard += room(card_rings(), wet_db=-13.5, echo_db=-8.5, dull_hz=3020)
    return (heard + fan() + air())[None]


def record(dry):
    """The highest pitches are cut off steeply."""
    return signal.sosfilt(signal.ellip(10, .1, 80, CUTOFF_HZ, fs=SR, output="sos"), dry)


dry = scene()
out = record(dry)
wav_record(out)
```